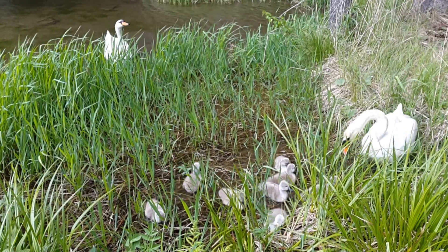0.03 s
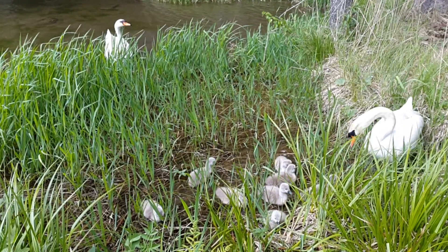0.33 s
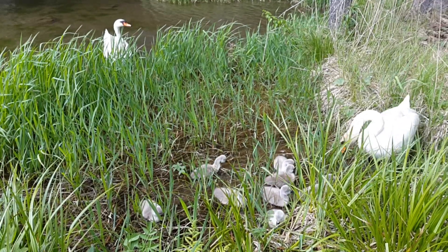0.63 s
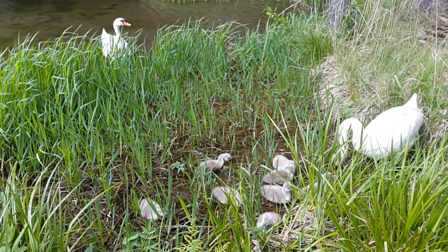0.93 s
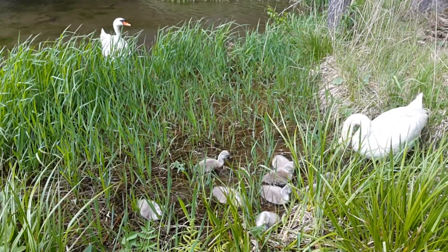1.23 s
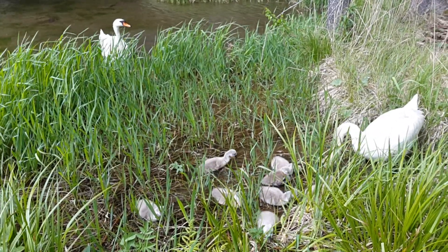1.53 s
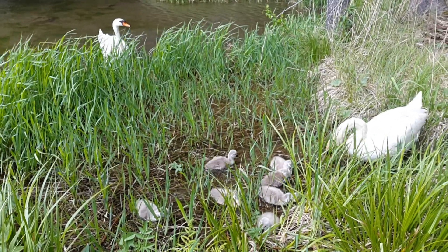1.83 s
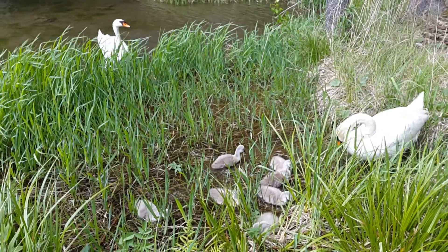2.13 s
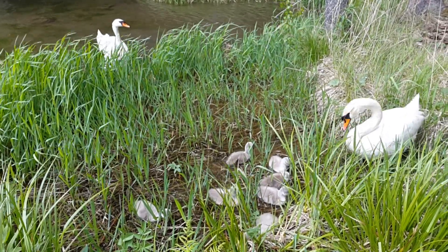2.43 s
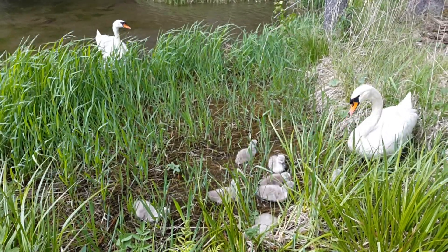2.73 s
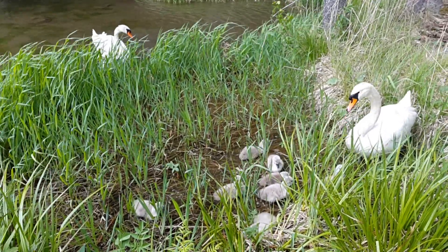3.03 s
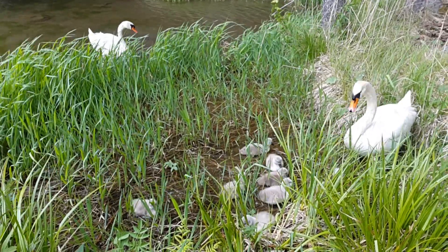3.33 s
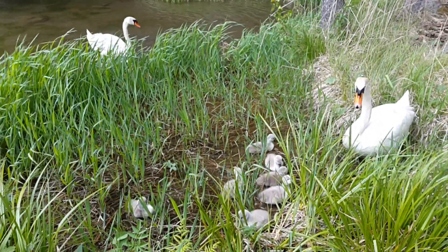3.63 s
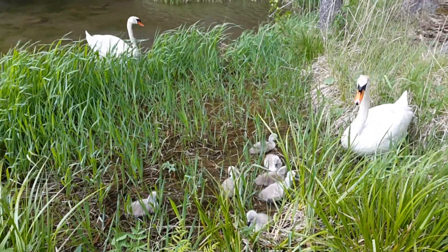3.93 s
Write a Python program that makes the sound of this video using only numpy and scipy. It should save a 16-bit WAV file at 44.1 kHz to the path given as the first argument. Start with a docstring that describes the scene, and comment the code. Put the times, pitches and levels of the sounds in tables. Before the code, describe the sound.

Wind rumbles on the microphone throughout, with a brief gust near 0.6 seconds, then stronger thumping gusts from about 2.2 seconds, heaviest between 3 and 4. A distant road hums steadily and reeds hiss faintly. Small birds peep softly nearby for the first 1.5 seconds, and dry stalks tick around 1.2. From about 2.2 seconds a farther songbird whistles faint falling notes with a slight echo.

```python
"""Wind on a reedy bank

Gusts rumble and thump on the microphone over the steady tyre hum of a distant road.
Small birds peep nearby, and a songbird further off whistles falling notes into echoing trees.
Dry stalks tick now and then, and air hisses faintly in the reeds."""
import sys
import numpy as np
from scipy import signal
from scipy.fft import rfft, irfft, next_fast_len
from scipy.io import wavfile
from scipy.ndimage import uniform_filter1d, map_coordinates

SR = 44100
rng = np.random.default_rng(int(sys.argv[2]) if len(sys.argv) > 2 else 0)


def int16_out(signal):
    """Quantize to a 16-bit WAV file."""
    q = np.round(np.clip(np.atleast_2d(signal).T, -1, 1) * 32767)
    wavfile.write(sys.argv[1], SR, q.astype(np.int16))


N = 176400

# wind strength at the microphone's two openings: t/s, left/dB, right/dB
GUSTS = [(0.0, -37.5, -42), (0.15, -41.5, -44.5), (0.38, -43, -47), (0.57, -33.5, -37.5), (0.68, -36, -44),
         (0.8, -44.5, -43.0), (1.02, -48.5, -49.5), (1.3, -38.5, -57), (1.49, -48.5, -34), (1.63, -38, -54),
         (1.85, -49.5, -45.5), (2.1, -45.5, -53), (2.22, -29.5, -46), (2.36, -24.5, -46),
         (2.41, -31.5, -32), (2.56, -39, -35), (2.69, -27, -30), (2.95, -30.5, -28), (3.169, -20.5, -24.5),
         (3.35, -24.5, -22.5), (3.491, -26, -29.5), (3.749, -26, -21.5), (4.0, -30.5, -30)]
# tone of the wind's low rumble and brighter flutter: f/Hz, relative level/dB
RUMBLE_TONE = [(20, -32), (40, -11.5), (75, 2), (125, 2), (175, -1), (290, -11.5), (450, -26), (700, -48.5),
               (2000, -120)]
FLUTTER_TONE = [(100, -16), (200, -1.5), (320, -1.5), (500, -13), (900, -29.5), (2000, -56), (5000, -86),
                (12000, -120)]
# single swirls of air: t/s, level/dB, f/Hz, side/dB (side is always left minus right)
SWIRLS = [(.141, -35.5, 144, 20), (.257, -35, 130, 13), (.551, -26.5, 121, -6), (.584, -30.5, 137, 23),
          (.653, -36, 171, 20), (.707, -35.5, 120, 16), (.726, -30, 163, -11.5), (.955, -38, 164, -17.5),
          (2.2, -33.5, 150, 22), (2.404, -23.5, 116, -10), (2.411, -26, 240, 9), (2.487, -28.5, 140, -13),
          (3.025, -25, 140, 8), (3.12, -22, 170, 4), (3.148, -19, 130, 6), (3.19, -23, 360, -3),
          (3.213, -24, 241, -10), (3.308, -21, 188, 20), (3.408, -20.5, 139, 19.5), (3.56, -23, 180, 12),
          (3.786, -15, 140, 0)]
# tone of the road: f/Hz, relative level/dB
ROAD_TONE = [(30, -1), (90, 9.5), (200, -9.5), (400, -7.5), (600, -3.5), (850, 2), (1050, -2), (1300, -6),
             (1650, -9), (2050, -18), (3000, -40), (6000, -55.5), (12000, -120)]
# how alike the road is in both ears: f/Hz, likeness (1 = the same)
ROAD_LIKENESS = [(100, 1), (300, 0.97), (640, .72), (1000, 0.29), (1400, -0.22), (3000, 0.1)]
# which way the road's hum leans: f/Hz, side/dB
ROAD_BALANCE = [(100, 5.5), (380, -8), (700, -3), (1290, -9), (2400, 2.5)]
# loudness of the road: t/s, level/dB
ROAD_LOUDNESS = [(0, -45), (1.2, -45), (2.5, -46), (4, -46.5)]
# bird notes: t/s, length/s, start f/Hz, held f/Hz, end f/Hz, base level/dB, side/dB
NEAR_PEEPS = [(.05, 0.13, 3000, 2770, 2930, -69.5, 9), (.337, 0.032, 3920, 3800, 3520, -69, -19),
              (.444, 0.027, 4380, 3890, 4120, -68, -26.5), (.558, 0.11, 4380, 3620, 3610, -59, -14.5),
              (.712, .05, 2420, 2570, 3000, -65, -3), (.764, .018, 2750, 2500, 2330, -67, 9),
              (.87, 0.1, 2950, 2950, 2640, -70, 18), (.957, 0.064, 2570, 2415, 2350, -57, -2),
              (1.06, 0.094, 3460, 3510, 3550, -62.5, -16), (1.154, 0.0334, 3630, 3620, 3100, -61, -1),
              (1.266, 0.034, 3310, 3470, 3320, -57, 1), (1.295, 0.06, 3220, 3160, 3160, -58.5, 7),
              (1.416, 0.044, 3930, 3540, 3630, -67, -16), (1.474, 0.11, 4050, 2480, 2116, -58.5, -1)]
FAR_WHISTLES = [(.192, 0.062, 4700, 4420, 4520, -66.5, -8), (2.245, 0.078, 2490, 2290, 2374, -62.5, -1),
                (2.728, 0.036, 4420, 4760, 4520, -59.5, -9), (2.752, 0.055, 4550, 4100, 3620, -57, -8.5),
                (2.805, 0.026, 3520, 3390, 2985, -56.5, -9), (3.035, .04, 3775, 3450, 3230, -61.5, -9),
                (3.115, 0.087, 3150, 2920, 2810, -62, 4), (3.28, 0.05, 2830, 2570, 2493, -60, -5.5),
                (3.36, .05, 3950, 3850, 3790, -73, -8), (3.6, .07, 3300, 2993, 2700, -60.5, -4),
                (3.785, 0.078, 2805, 2724, 2713, -58.5, 0), (3.905, 0.097, 4450, 4215, 3560, -57, -11)]
# echo of the trees: f/Hz, time to fade by 60 dB/s
ECHO_FADE = [(500, 1.1), (3000, 1.3), (5000, .8), (10000, 0.29)]
# snapping stalks: t/s, base level/dB, centre f/Hz, width/octaves, time to fade by 60 dB/s, side/dB
STALK_SNAPS = [(.176, -70, 7000, .9, 0.033, 15), (.468, -61, 4140, 0.46, 0.25, -3),
               (1.116, -42.5, 1690, 0.77, 0.02, -7), (1.128, -47, 2170, 0.1, .03, 4),
               (1.2415, -40.5, 5050, .24, .012, -5.5), (1.249, -53, 3880, 0.11, 0.022, -4),
               (1.6247, -61, 8000, 1, .006, -2), (1.6746, -67, 11200, 0.98, 0.018, 2),
               (1.962, -66, 10000, .5, 0.044, 6), (1.9814, -58, 6000, .5, .014, -2),
               (3.0545, -70.5, 6500, .9, 0.06, 9.5), (3.2615, -59, 9000, .45, .014, 3),
               (3.6546, -80, 6300, .3, .025, -3), (3.7249, -77, 8000, 0.93, .03, 18)]
# tone of the reeds' hiss: f/Hz, relative level/dB
REED_TONE = [(1000, -2), (2300, -0.5), (4300, -3.5), (5500, -7), (7000, -12), (9000, -15.5), (12000, -15),
             (15500, -18.5)]
# which way the hiss leans: f/Hz, side/dB
REED_BALANCE = [(2400, 0), (4400, -2.4), (8000, 1.1), (15000, 2.2)]
# loudness of the hiss: t/s, level/dB
REED_LOUDNESS = [(0, -63.5), (1.5, -62.5), (2.6, -64.5), (4, -64)]


def wind():
    """Swirling air hits each microphone opening separately; strong gusts add a brighter flutter."""
    times, *openings = np.transpose(GUSTS)
    gust_db = np.array([curve(np.c_[times, db]) for db in openings])
    swirls = np.array([wobble(per_second=49), wobble(per_second=45)])
    rumble = unit(gain(2.5 * swirls) * noise(RUMBLE_TONE, likeness=[(100, .05)], patchy_db=.5))
    flutter = unit(gain(3.5 * swirls) * noise(FLUTTER_TONE, likeness=[(300, .035)], patchy_db=2.5))
    strong_gust_db, flutter_growth = -27, 2.14
    flutter_db = -43.5 + flutter_growth * (gust_db - strong_gust_db)
    return rumble * gain(gust_db - 1) + flutter * gain(flutter_db)


def thumps():
    """A lone swirl of air swings the pressure back and forth once or twice."""
    out, t = np.zeros((2, N)), np.arange(-SR // 20, SR // 20) / SR
    width_cycles = .45
    for (when, db, hz, side_db), phase in zip(SWIRLS, rng.random(len(SWIRLS))):
        swell = np.exp(-.5 * (t * hz / width_cycles) ** 2)
        swing = np.sin(2 * np.pi * (hz * t + phase))
        add(out, when + t[0], pan(side_db) * gain(db) * swell * swing)
    return out


def road():
    """Far-off tyres hum steadily, the middle tones to the right and the bass to the left."""
    tyres = noise(ROAD_TONE, ROAD_LIKENESS, patchy_db=.57)
    hum = filtered(tyres, lambda hz: pan(look_up(ROAD_BALANCE, hz)))
    return unit(hum) * gain(curve(ROAD_LOUDNESS))


def birds():
    """Near peeps mostly reach us directly, far whistles mostly as echo."""
    near = bird_notes(NEAR_PEEPS, settle=.19, bend_power=1.2, fade=.098, waver=.01)
    far = bird_notes(FAR_WHISTLES, settle=.3, bend_power=1.39, fade=.25, waver=.035)
    return near + gain(-3.5) * far + tree_echo(gain(-11) * near + gain(1) * far)


def bird_notes(rows, settle, bend_power, fade, waver):
    """Wavering tones slide to a held pitch, then bend away; settle and fade are shares of a note."""
    out = np.zeros((2, N))
    rise_db, flicker_db = 4, 2.35
    for when, length, start_hz, held_hz, end_hz, db, side_db in rows:
        n = int(length * SR)
        progress = np.linspace(0, 1, n)
        hz = held_hz + (start_hz - held_hz) * np.exp(-progress / settle)
        hz += (end_hz - held_hz) * progress ** bend_power
        hz *= 1 + waver * wobble(per_second=317)[:n]
        tone = np.sqrt(2) * np.sin(2 * np.pi * np.cumsum(hz) / SR)
        swell = np.sin(np.pi / 2 * np.clip(np.minimum(progress, 1 - progress) / fade, 0, 1))
        level = gain(db + rise_db * (progress - 1.5) + flicker_db * wobble(per_second=90)[:n])
        add(out, when, pan(side_db) * level * swell * tone)
    return out


def tree_echo(sound):
    """Trees scatter the sound into an echo whose highest tones die first."""
    hz, t, bands = signal.stft(rng.standard_normal((2, SR)), SR, nperseg=256)
    tail = signal.istft(bands * gain(-60 * t / look_up(ECHO_FADE, hz)[:, None]))[1]
    return signal.fftconvolve(sound, tail / np.linalg.norm(tail[0]), axes=1)[:, :N]


def stalks():
    """Dry stalks snap in short bursts of noise, among many faint ticks at random times."""
    out, t = np.zeros((2, N)), np.arange(-SR // 50, SR // 5) / SR
    hz = np.fft.rfftfreq(len(t), 1 / SR) + 1
    tick_count, tick_db, tick_hz, tick_fade_s = 40, -70.5, 7900, .007
    ticks = [(at * N / SR, tick_db - 4 * np.log(1 - loud), tick_hz * 2 ** (high - .5), 1, tick_fade_s, 0)
             for at, loud, high in rng.random((tick_count, 3))]
    for when, db, centre_hz, octaves, fade_s, side_db in STALK_SNAPS + ticks:
        snap = rng.standard_normal((2, len(t))) * (t >= 0) * gain(-60 * abs(t) / fade_s)
        tone = unit(np.exp(-.5 * (np.log2(hz / centre_hz) / octaves) ** 2))
        add(out, when + t[0], pan(side_db) * gain(db) * irfft(rfft(snap) * tone))
    return out


def reeds():
    """Air hisses faintly through the leaves."""
    air = noise(REED_TONE, likeness=[(3000, .032)], patchy_db=1.45)
    hiss = filtered(air, lambda hz: pan(look_up(REED_BALANCE, hz)))
    return unit(hiss) * gain(curve(REED_LOUDNESS) + .28 * wobble(per_second=10))


def noise(tone, likeness, patchy_db):
    """Stereo noise with randomly louder and softer patches in time and pitch."""
    def shape(hz):
        angle = np.arccos(np.clip(look_up(likeness, hz), -1, 1)) / 2
        return gain(look_up(tone, hz)) * [np.cos(angle), np.sin(angle)]

    bands = signal.stft(rng.standard_normal((2, N)), nperseg=512)[2]
    patches = uniform_filter1d(rng.standard_normal(bands.shape[1:]), size=5, axis=0)
    patches = uniform_filter1d(patches, size=16, axis=1)
    pair = signal.istft(bands * gain(patchy_db * unit(patches)))[1][:, :N]
    shared, opposite = filtered(pair, shape)
    return unit(np.array([shared + opposite, shared - opposite]))


def gain(db):
    """Turn decibels into a multiplier."""
    return 10 ** (np.asarray(db) / 20)


def unit(x):
    """Scale to an average strength (rms) of 1."""
    return x / np.sqrt(np.mean(x ** 2) + 1e-20)


def look_up(rows, hz):
    """Read between (f/Hz, value) rows on an octave scale."""
    f, values = np.transpose(rows)
    return np.interp(np.log(hz + 1), np.log(f + 1), values)


def curve(rows):
    """Join (t/s, value) rows into one value per sample."""
    return np.interp(np.arange(N) / SR, *np.transpose(rows))


def wobble(per_second):
    """A smooth curve through evenly spaced random points."""
    points = rng.standard_normal(int(N * per_second / SR) + 4)
    return map_coordinates(points, [np.arange(N) * per_second / SR])


def pan(side_db):
    """Left and right multipliers; positive leans left."""
    return gain(np.array([[.5], [-.5]]) * side_db)


def filtered(sound, response):
    """Multiply each frequency by response(hz)."""
    size = next_fast_len(N + SR // 2)
    return irfft(rfft(sound, size) * response(np.fft.rfftfreq(size, 1 / SR)), size)[..., :N]


def add(out, start_s, sound):
    """Mix a sound into out."""
    part = out[:, max(round(start_s * SR), 0):][:, :sound.shape[-1]]
    part += sound[..., :part.shape[1]]


def scene():
    """Everything heard from the bank."""
    return wind() + thumps() + road() + reeds() + birds() + stalks()


def record(dry):
    """The camera thins the deepest bass and cuts off the highest treble."""
    bass_hz, top_hz = 21, 15750
    return filtered(dry, lambda hz: (hz < top_hz) * hz ** 2 / np.hypot(hz ** 2, bass_hz ** 2))


dry = scene()
out = record(dry)
int16_out(out)
```